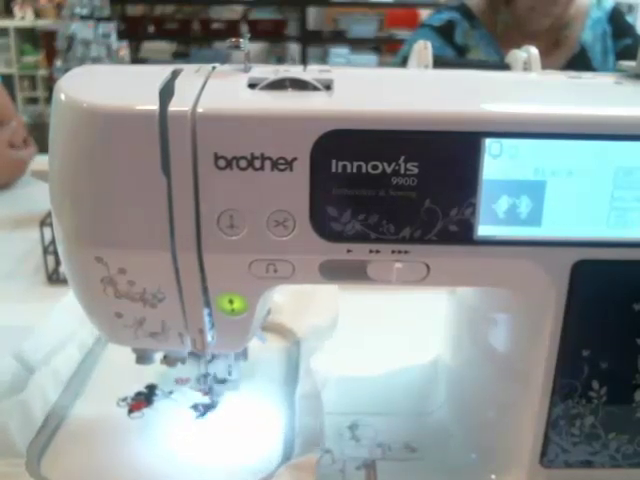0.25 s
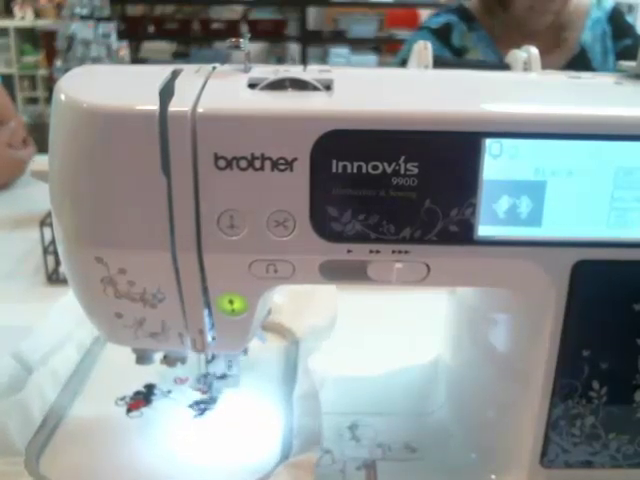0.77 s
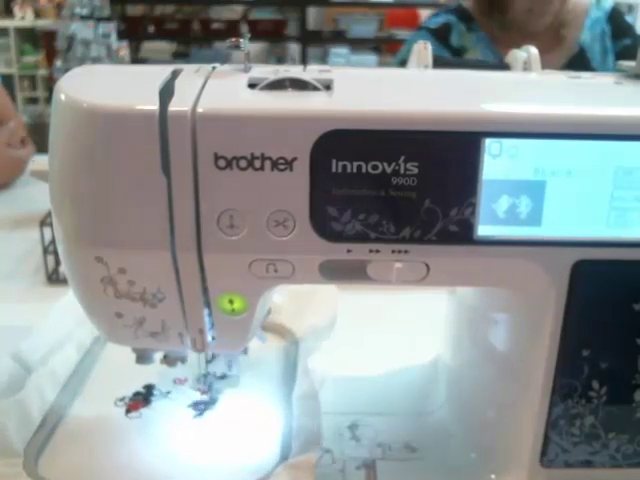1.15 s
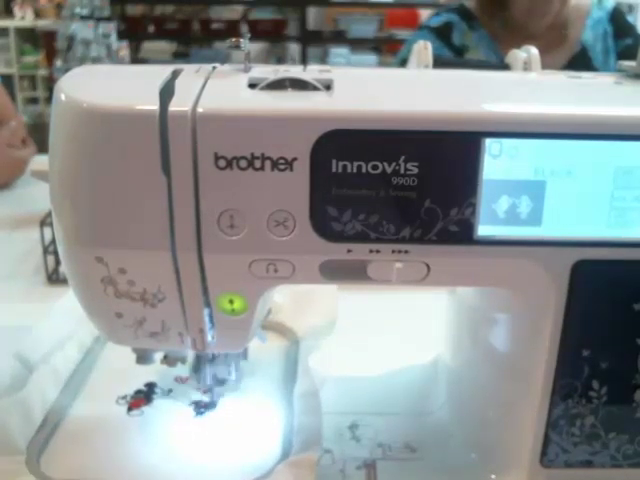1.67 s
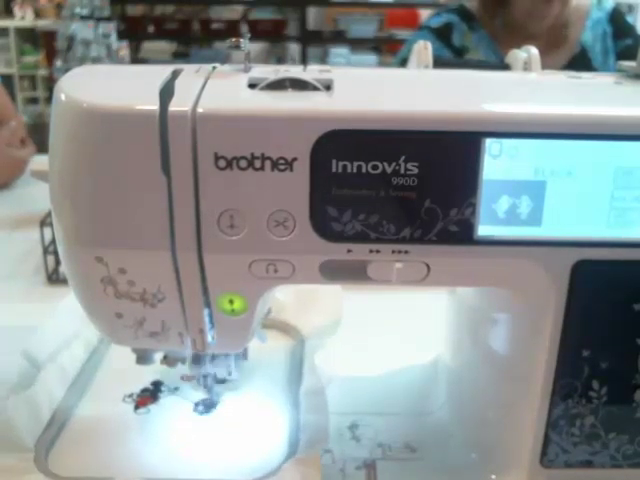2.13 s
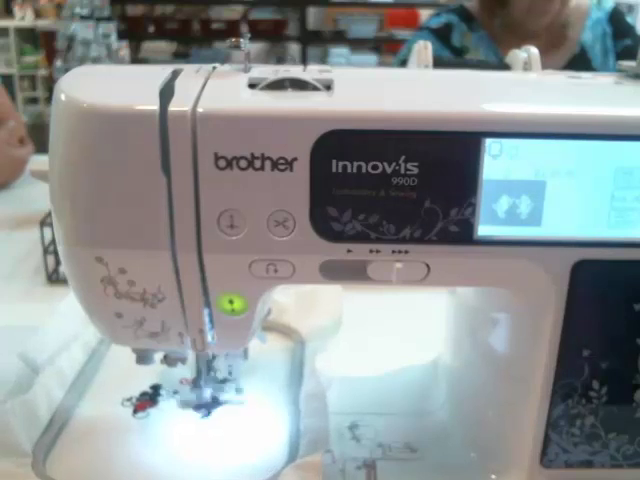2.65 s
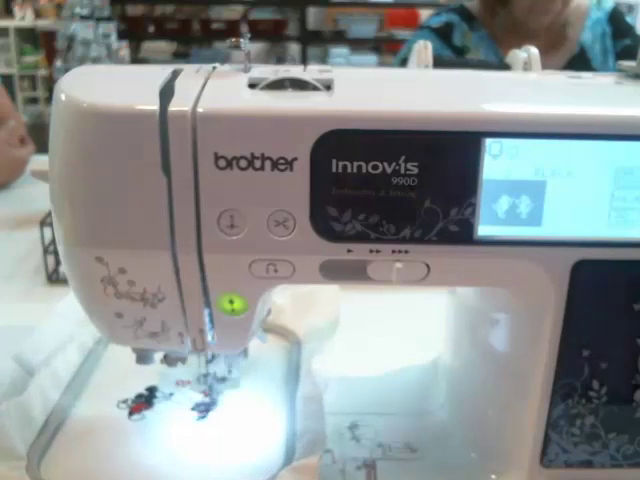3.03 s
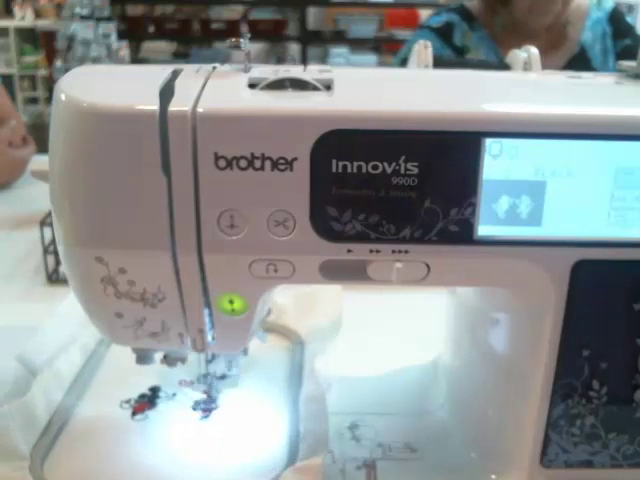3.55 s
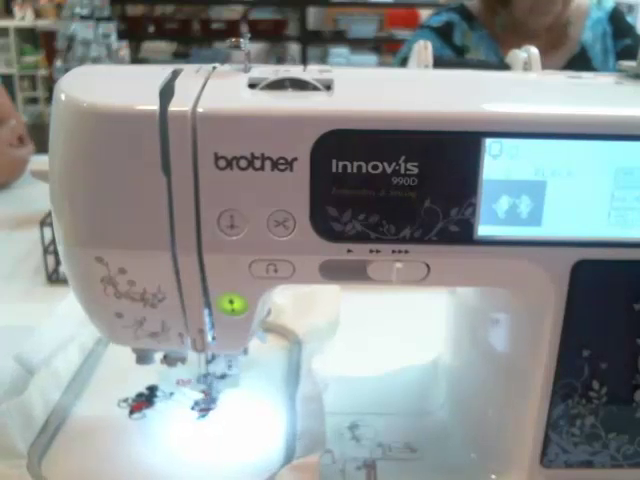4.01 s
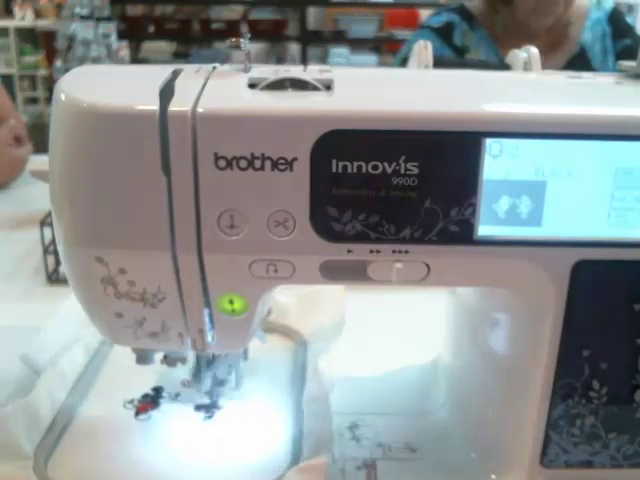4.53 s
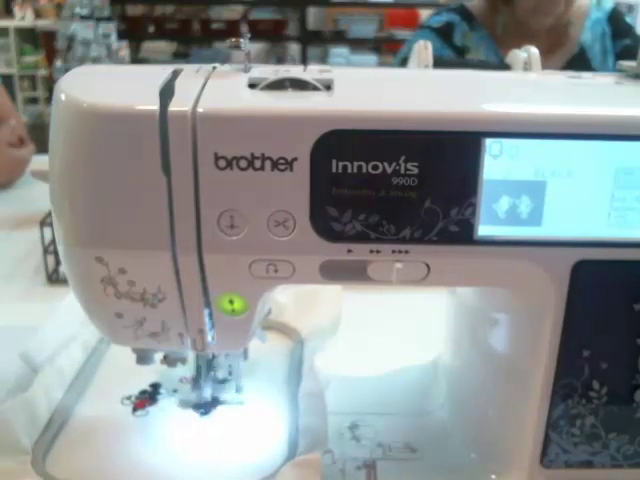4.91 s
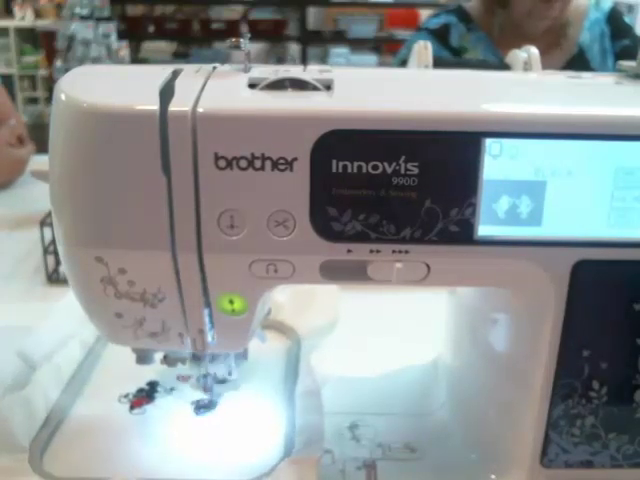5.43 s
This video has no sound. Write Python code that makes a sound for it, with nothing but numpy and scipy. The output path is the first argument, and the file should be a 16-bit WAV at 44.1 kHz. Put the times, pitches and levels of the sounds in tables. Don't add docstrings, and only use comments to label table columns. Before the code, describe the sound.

Close, rapid mechanical clatter: soft double knocks and rattling metal repeat evenly while a machine whines and hums in a small room.

```python
import sys
import numpy as np
from scipy import signal
from scipy.fft import rfft, irfft, next_fast_len
from scipy.io import wavfile
from scipy.ndimage import uniform_filter1d

SR = 44100
rng = np.random.default_rng(int(sys.argv[2]) if len(sys.argv) > 2 else 0)


def dump(signal):
    limited = np.clip(np.atleast_2d(signal).T, -1, 1)
    pcm = np.round(limited * 32767).astype(np.int16)
    wavfile.write(sys.argv[1], SR, pcm)


def ratio(d):
    e = np.asarray(d, float) / 20
    return 10 ** e


N = 250047
TURN_S, FIRST_S, STITCH_COUNT = .14937, .0905, 38


def unit(x):
    return x / np.sqrt(np.mean(x ** 2))


def colour(x, points, peaks=()):
    size = next_fast_len(N)
    hz = np.arange(size // 2 + 1) * SR / size + 1
    curve_hz, curve_db = np.array(points, float).T
    gain_db = np.interp(np.log(hz), np.log(curve_hz), curve_db)
    for centre_hz, width_hz, peak_db in peaks:
        gain_db = gain_db + peak_db / (1 + (2 * (hz - centre_hz) / width_hz) ** 2)
    return irfft(rfft(x, size) * ratio(gain_db), size)[:N]


def walk(rate_hz):
    hold = int(SR / rate_hz)
    levels = np.repeat(rng.standard_normal(N // hold + 1), hold)
    slewed = uniform_filter1d(uniform_filter1d(levels, hold), hold)
    return unit(slewed[:N])


def add(out, start_s, wave):
    i = int(round(start_s * SR))
    first, last = max(i, 0), min(i + len(wave), N)
    if last > first:
        out[first:last] += wave[first - i:last - i]


def ring(pitch_hz, rise_ms):
    t = np.arange(int(.25 * SR)) / SR
    rise = t * 1000 / max(rise_ms, .5)
    return rise * np.exp(1 - rise) * np.sin(2 * np.pi * pitch_hz * t)


def tick(decay_ms):
    ms = np.arange(int(.018 * SR)) * 1000 / SR
    front = np.minimum(ms / .88, 1)
    return rng.standard_normal(len(ms)) * np.exp(-ms / max(decay_ms, .3)) * front


def shaft():
    lead_s = .02
    t = np.arange(N) / SR - FIRST_S + lead_s
    turn = np.floor(t / TURN_S).astype(int)
    return turn, (t - turn * TURN_S - lead_s) * 1000


# start_s [s], blow_db, slide_db, release_db [dB]
ACCENTS = [(.09, 0.5, 2, -0.5), (.389, 1, 1, 5), (.539, -0.5, 4, 4.5), (.688, 0.5, -10, -3),
           (.837, -3.5, 1, 2), (.987, 1.1, -4, -6.5), (1.136, 3.5, -3.5, 4.5), (1.285, 3, 1, -6),
           (1.435, -0.2, 2.5, 1), (1.584, 0.5, 6, 1.5), (1.734, 0, 4.5, 4), (2.032, 0.3, 1, -3),
           (2.182, 1, -2.5, -1), (2.331, 1, -5, .6), (2.779, 0.5, 3, 8), (2.929, 0.5, -1.5, -1),
           (3.078, 1, 1.5, -3), (3.227, 1, -3.5, -2), (3.377, -2.5, 3, 2), (3.526, 0.5, 0.5, -4.5),
           (3.675, 3, 1.1, -0.5), (3.825, -0.5, 1, 6.5), (3.974, 0, 5.5, -3.5), (4.124, -1.5, 2, 7),
           (4.572, 3.5, 3.5, 1), (4.721, 0.5, 4, -10), (4.87, -3, 6.5, 1), (5.169, 3, 2, 3),
           (5.468, -2, -7, -3), (5.617, -0.5, -6, 3.5)]


def accents(turn):
    rows = np.array(ACCENTS)
    stitch = np.round((rows[:, 0] - FIRST_S) / TURN_S).astype(int)
    extra_db = np.zeros((STITCH_COUNT, 3))
    extra_db[stitch] = rows[:, 1:]
    return extra_db[np.maximum(turn, 0)].T


# pitch_hz [Hz], level_db [dB per Hz]
RUNNING = [(20, -6.5), (45, -7.5), (80, -24), (92, -2), (140, -3), (250, -2), (500, -6.5), (660, -13),
           (860, -8.5), (1000, -8), (1190, -13), (1300, -18), (3000, -24.5), (5200, -30), (11000, -38.5)]
# pitch_hz [Hz], width_hz [Hz], level_db [dB]
HOUSING = [(113, 34, 5), (440, 37, 3), (920, 170, 2.5), (2200, 81, 5.5), (2880, 100, 2), (3430, 100, 4.5),
           (4300, 720, 7), (4680, 80, 4), (6160, 200, 2.5), (7240, 200, -7)]


def running(repeat_share=.2, flicker_db=2.5):
    ms = shaft()[1]
    one_turn = rng.standard_normal(int(TURN_S * SR) + 2)
    repeat = one_turn[((ms - ms.min()) * SR / 1000).astype(int)]
    fresh = rng.standard_normal(N) * ratio(flicker_db * walk(150))
    noise = np.sqrt(repeat_share) * repeat + np.sqrt(1 - repeat_share) * fresh
    idle_drop_db, idle_ms = -2, 103
    ease_db = idle_drop_db * np.cos(2 * np.pi * (ms - idle_ms) / (TURN_S * 1000)) / 2
    return unit(colour(noise * ratio(ease_db), RUNNING, HOUSING)) * ratio(-48.5)


# pitch_hz [Hz], level_db [dB rms]
MOTOR = [(62.65, -76), (120.08, -63), (814.4, -72), (939.65, -68), (1002.3, -71)]
# start_ms [ms into turn], level_db [dB rms]
BELT = [(-32, -63), (-24, -56), (8, -54.5), (22, -55), (45, -53), (65, -56), (85, -55), (107, -54.5),
        (117, -63)]


def whine(flutter_db=.6, wobble_rad=.08):
    belt_hz = 879.9
    ms = shaft()[1]
    ms = np.where(ms > BELT[-1][0], ms - TURN_S * 1000, ms)
    belt = np.sin(2 * np.pi * belt_hz * ms / 1000 + wobble_rad * walk(43))
    belt = belt * ratio(np.interp(ms, *np.transpose(BELT)) + flutter_db * walk(60))
    t = np.arange(N) / SR
    motor = sum(ratio(level_db) * np.sin(2 * np.pi * pitch_hz * t) for pitch_hz, level_db in MOTOR)
    return np.sqrt(2) * (belt + motor)


# start_ms [ms into turn], pitch_hz [Hz], rise_ms [ms], level_db [dB]
CAMS = [(-2.9, 248, 10.5, -37.4), (.7, 455, 12, -48.4), (5.1, 302, 9.7, -36.8), (16.5, 292, 3.5, -36.3),
        (21.6, 351, 1.7, -47.7), (30.3, 335, 12, -44.8), (40.3, 331, 2.7, -33), (45.8, 502, 1.8, -40.5),
        (49, 560, 5, -47.5), (56.9, 390, 3.6, -46.7), (65.8, 230, 11.5, -53.9), (81.5, 237, 7.9, -49.3),
        (109.3, 417, 6, -48), (120.6, 450, 3, -52)]
# start_ms [ms into turn], pitch_hz [Hz], rise_ms [ms], level_db [dB]
TABLE = [
    (-4, 101, 16, -51.5),
    (43, 99, 16, -51.5),
]


def cams(scatter_db=.9, jitter_ms=.05):
    blow_ms = 12
    out = np.zeros(N)
    for turn in range(-1, STITCH_COUNT):
        strike_s = FIRST_S + turn * TURN_S
        blow_db = accents(turn)[0]
        chance = rng.standard_normal((len(CAMS), 2))
        for (start_ms, pitch_hz, rise_ms, level_db), (late, loud) in zip(CAMS, chance):
            knock_db = level_db + scatter_db * loud + (start_ms < blow_ms) * blow_db
            start_s = strike_s + (start_ms + jitter_ms * late) / 1000
            add(out, start_s, ratio(knock_db) * ring(pitch_hz, rise_ms))
        for start_ms, pitch_hz, rise_ms, level_db in TABLE:
            push_db = level_db + 4.5 * rng.standard_normal()
            add(out, strike_s + start_ms / 1000, ratio(push_db) * ring(pitch_hz, rise_ms))
        add(out, strike_s + .00036 * rng.standard_normal(), ratio(-46.5) * ring(1024, 2.6))
    return out


# start_ms [ms into turn], level_db [dB]
RUMBLE = [(-12, -19), (-2, -10), (5, -5.5), (20, -2), (32, 0), (45, -1), (56, -6.5), (75, -16), (95, -28)]
# pitch_hz [Hz], level_db [dB per Hz]
RUMBLE_COLOUR = [(90, -15.5), (150, -5.5), (200, 0), (280, 3.5), (370, 4.5), (450, -2), (580, -6),
                 (720, -9.5), (1100, -49.5)]


def carriage(flicker_db=1.5, trim_db=-6):
    turn, ms = shaft()
    blow_db, slide_db, _ = accents(turn)
    early_db = -35.5 + blow_db
    late_db = -37 + .25 * slide_db
    late = np.interp(ms, [14, 26], [0, 1])
    effort_db = (1 - late) * early_db + late * late_db
    shake = unit(colour(rng.standard_normal(N), RUMBLE_COLOUR)) * ratio(flicker_db * walk(90))
    return shake * ratio(effort_db + trim_db + np.interp(ms, *np.transpose(RUMBLE), right=-60))


# start_ms [ms into turn], level_db [dB]
RATTLE = [(-19, -23), (-1.5, -11), (-4, -4.5), (12, 1), (19, -2), (34, -2.5), (43.5, -1.5), (51, -18.5),
          (128, -35)]
# start_s [s], level_db [dB peak]
STRAYS = [(0.3047, -48), (0.4545, -31.5), (0.5117, -41), (0.7532, -43), (0.865, -31), (1.1084, -56),
          (1.258, -39), (1.763, -26.5), (1.9542, -38.5), (2.0063, -44), (2.5104, -31.5), (2.6194, -34),
          (2.6708, -51), (2.8115, -37), (2.9602, -49), (3.406, -37), (3.7983, -53), (4.1554, -31),
          (4.5446, -42), (4.5994, -47), (4.694, -47), (4.843, -44), (4.9037, -32), (5.0794, -45),
          (5.199, -31), (5.5892, -49), (1.061, -41), (1.21, -45), (4.071, -46), (4.183, -44)]


def rattle(grain_db=2.2, flicker_db=2.4):
    turn, ms = shaft()
    blow_db, slide_db, release_db = accents(turn)
    corners_ms = [12, 24, 34, 41]
    effort_db = np.interp(ms, corners_ms, [1, 0, 0, 0]) * (-44 + .15 * blow_db)
    effort_db += np.interp(ms, corners_ms, [0, 1, 1, 0]) * (-45.5 + slide_db)
    effort_db += np.interp(ms, corners_ms, [0, 0, 0, 1]) * (-46.5 + release_db)
    parts = [[(1500, 0), (2100, -30)],
             [(1400, -30), (1900, 0), (3000, 0), (3900, -30)],
             [(2700, -30), (3500, 0), (5500, 0), (7500, -30)],
             [(5000, -30), (7000, 0)]]
    grains = np.zeros(N)
    for part in parts:
        uneven_db = grain_db * walk(700) + flicker_db * walk(180)
        grains += colour(rng.standard_normal(N) * ratio(uneven_db), part)
    gate_db = np.interp(ms, *np.transpose(RATTLE), right=-60) - .5
    chatter = unit(grains) * ratio(effort_db + gate_db)
    strays = np.zeros(N)
    for start_s, level_db in STRAYS:
        add(strays, start_s, ratio(level_db - 3) * tick(2.5))
    return chatter + colour(strays, [(1200, -20), (3000, 2), (5500, -3.5), (10000, -5)])


# [dB, bright edge]
TICKS = [(-3, -61.5, -54), (0.17, -50.5, -58.5), (8.5, -52, -55), (29.5, -56, -60), (42, -53, -59),
         (59, -60, -66), (66.5, -61, -77), (74.5, -75, -71), (96, -70, -70), (122, -62, -72)]


def ticks(scatter_db=2.2, jitter_ms=.7):
    body, edge = np.zeros(N), np.zeros(N)
    for turn in range(-1, STITCH_COUNT):
        chance = rng.standard_normal((len(TICKS), 2))
        for (start_ms, body_db, edge_db), (late, loud) in zip(TICKS, chance):
            start_s = FIRST_S + turn * TURN_S + (start_ms + jitter_ms * late) / 1000
            add(body, start_s, ratio(body_db + 4 + scatter_db * loud) * tick(1.8))
            add(edge, start_s, ratio(edge_db + 7.5 + scatter_db * loud) * tick(3.5))
    return body + colour(edge, [(2000, -47), (5000, -2), (9000, 11)])


# pitch_hz [Hz], level_db [dB per Hz]
RATTLE_COLOUR = [(300, -2), (900, 0.5), (1300, -0.5), (2000, -4), (2900, -1), (3300, -5.5), (4300, -5.5),
                 (5500, -7), (6200, -4), (8000, -12.5), (10500, -17), (11500, -16.5), (16500, -16)]
# pitch_hz [Hz], width_hz [Hz], level_db [dB]
METAL = [(1733, 162, 13), (2116, 93, 3.5), (2545, 74, 4.5), (2879, 56, 4.5), (3960, 120, 4.5),
         (4320, 100, 6.5), (5970, 190, 6.5)]


def metal(struck):
    gain = np.std(colour(rng.standard_normal(N), RATTLE_COLOUR, METAL))
    return colour(struck, RATTLE_COLOUR, METAL) / gain


def room(x, t60_s=.2, wet_db=-16):
    t = np.arange(int(.4 * SR)) / SR
    tail = rng.standard_normal(len(t)) * np.exp(-np.log(1000) * t / t60_s) * (t > .003)
    tail = tail / np.sqrt(np.sum(tail ** 2))
    tail = colour(tail, [(2000, 0), (5000, -10), (10000, -16)])[:len(t)]
    return x + ratio(wet_db) * signal.fftconvolve(x, tail)[:N]


def scene():
    steady = running() + whine()
    in_room = room(metal(rattle() + ticks()) + carriage())
    return (steady + cams() + in_room)[None]


STEP_HZ = [11000, 12570, 14330, 16370]
STEP_DB = [-5.5, -8, -8.5, -9]


def microphone(dry):
    step_width_hz, top_hz, hiss_db, offset = 60, 17180, -90, .0012
    hz = np.arange(N // 2 + 1) * SR / N
    top_db = np.zeros(len(hz))
    for pitch_hz, level_db in zip(STEP_HZ, STEP_DB):
        top_db += level_db / (1 + np.exp((pitch_hz - hz) / step_width_hz))
    hiss = ratio(hiss_db) * rng.standard_normal(N)
    return irfft((rfft(dry) * ratio(top_db) + rfft(hiss)) * (hz < top_hz), N) + offset


def roll_off(x):
    return signal.sosfilt(signal.butter(12, 17080, fs=SR, output="sos"), x)


def record(dry):
    return roll_off(microphone(dry))


dry = scene()
out = record(dry)
dump(out)
```